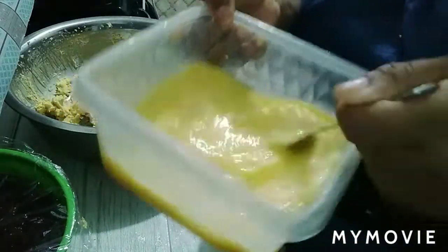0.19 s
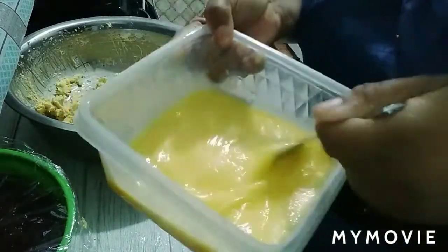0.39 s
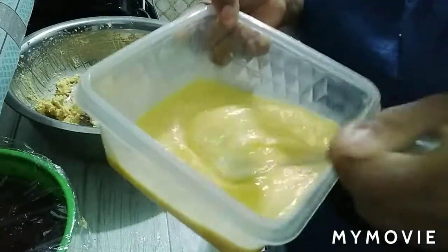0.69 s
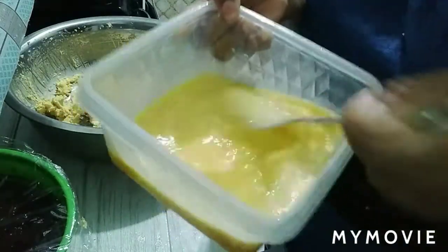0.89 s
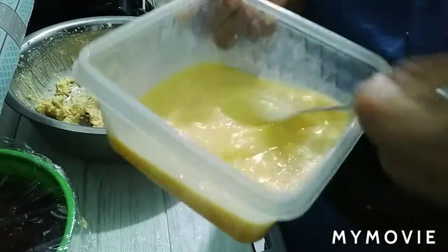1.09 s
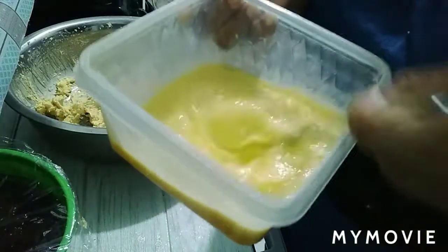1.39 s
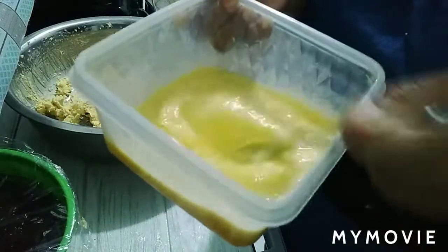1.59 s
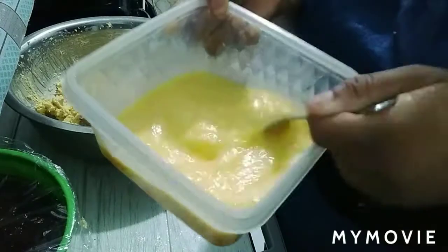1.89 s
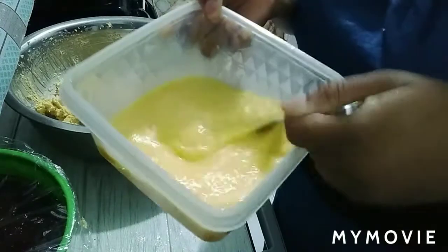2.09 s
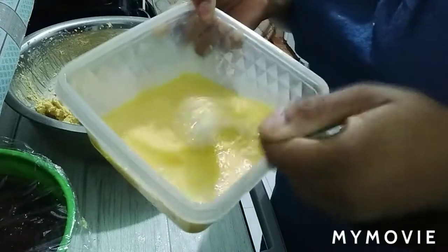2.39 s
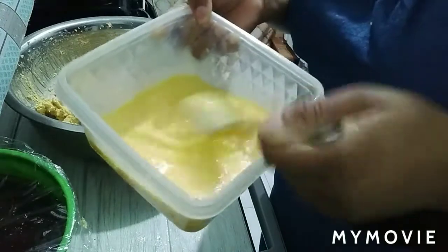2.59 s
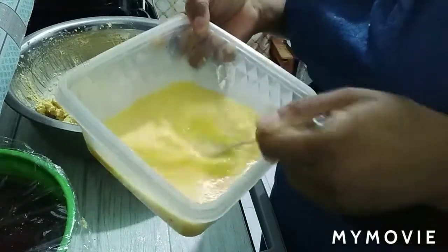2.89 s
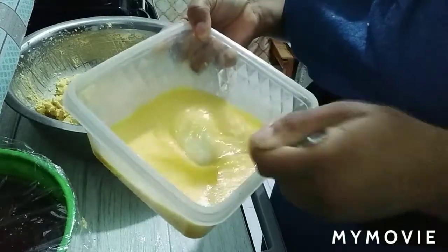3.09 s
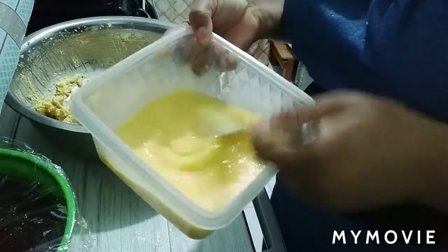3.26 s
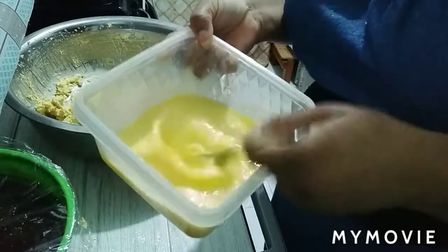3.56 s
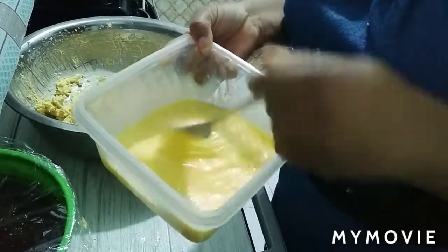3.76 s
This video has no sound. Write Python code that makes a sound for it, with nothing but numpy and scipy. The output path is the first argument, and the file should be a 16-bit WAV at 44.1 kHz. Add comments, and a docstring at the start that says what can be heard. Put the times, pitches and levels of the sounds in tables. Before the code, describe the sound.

A fork briskly beats eggs in a plastic tub, hollow knocks and wet sloshes nearly five times a second

```python
"""A fork beats eggs in a hand-held plastic tub in a small kitchen, close to five turns a second.
It starts with soft sloshes and a knock that also catches the side of the tub, which rings on.
On each later turn the wet tines spit crackling drops, plunge in with a slosh of ringing bubbles, drag
through the egg with a squelch of fine clicks and knock on the tub, whose modes give a short hollow note.
The last knock is gentle, then the background hiss, filtered noise over a low rumble, is faded down."""
import sys
import numpy as np
from scipy import signal
from scipy.fft import rfft, irfft
from scipy.io import wavfile

SR = 44100
rng = np.random.default_rng(int(sys.argv[2]) if len(sys.argv) > 2 else 0)


def unload_audio(sound):
    """Save the sound as a 16-bit wav file, at the path given as the first command line argument."""
    columns = np.transpose(np.atleast_2d(sound))
    # keep every value between -1 and 1, then stretch to whole-number steps
    steps = np.round(np.clip(columns, -1, 1) * 32767)
    wavfile.write(sys.argv[1], SR, steps.astype(np.int16))


N = 174195
AGE = np.arange(SR // 4) / SR  # time since a short sound began [s]

# In all tables, t60 is the time a sound takes to fall by 60 dB.
# the fork knocks on the tub; the levels are added to those of the modes, clack and tick:
# (time [s], hollow note [dB], wall clack [dB], tine tick [dB])
KNOCKS = [(0.2154, -19.5, -1, -1.5), (0.219, -4.5, 1, -5), (0.4438, -8.5, -4.5, -14), (0.6364, 0, 7.5, 1.5),
          (0.8483, 1, 5, 2), (1.0634, 2, 8.5, 2.5), (1.2712, 1, 7, 1), (1.4820, 1, 5.5, 4),
          (1.7017, 0.5, 4.5, 3.5), (1.9168, -1.5, 2, -11), (2.1242, -0.5, 4.5, 4), (2.3432, -3, 6.5, -7),
          (2.5657, -2.5, 2, 1.5), (2.7902, -1.5, 3, 0.5), (2.9947, -0.5, 3.5, 1), (3.2229, -2, 1.5, -22),
          (3.4419, -3.5, 2.5, 1.5), (3.6874, -11.5, -6.5, -38)]
# blend of the two wall levels, almost wholly mid-wall throughout:
# (time [s], share of mid-wall level [0 to 1])
MID_WALL_SHARE = [(1.7, 1), (1.92, 0.97)]
# modes of the loaded tub, and the low notes that linger around it:
# (frequency [Hz], level [dB], t60 [s], polarity [+1 or -1])
TUB_MODES = [(198.6, -40, 0.11, 1), (358.4, -15, 0.018, 1), (528.3, -2, 0.017, -1), (581, -5, 0.015, 1),
             (446, -47.5, 0.29, 1), (560, -56, 0.044, 1)]
# modes of the walls:
# (frequency [Hz], level struck near the corner [dB], level struck mid-wall [dB], t60 [s])
WALL_MODES = [(920, -40, -44.5, 0.03), (1157, -43, -39, 0.027), (1375, -44.5, -38.5, 0.012),
              (1510, -37, -43, 0.042), (1775, -53, -51, 0.051), (2447, -44, -55, 0.04)]
# modes of the tub's side, caught by the first knock:
# (frequency [Hz], level [dB], t60 [s], polarity [+1 or -1])
SIDE_MODES = [(205.6, -44, 0.25, 1), (332, -20, 0.035, 1), (573, -15.5, 0.036, -1), (651, -38.5, 0.16, 1),
              (830, -22, 0.027, 1), (928, -27, 0.046, -1)]
SIDE_KNOCK_S = .2156
TUB_DETUNE, WALL_DETUNE = 0.022, 0.011  # typical change of pitch from blow to blow, as a share
DAMPING_SCATTER, WALL_SCATTER_DB = 0.11, 3  # typical change of damping (log scale) and of strength

# tone colour of the tines' tick: (frequency [Hz], level [dB])
TICK_COLOUR = [(1500, -6), (2300, -5.5), (2750, 5), (3150, -15.5), (3550, 2.5), (4500, -11), (5300, -5),
               (7200, -4.5), (8500, -24), (10400, -21), (12000, -36.5), (16000, -47.5)]
# tone colour of the grit in the wall clack: (frequency [Hz], level [dB])
CLACK_COLOUR = [(300, -21.5), (900, 2.5), (1600, -3.5), (2200, -13), (3200, -22.5), (8000, -46)]
TICK_DB, TICK_FADE_S = -49.5, 0.0021
CLACK_DB, CLACK_FADE_S = -46.5, 0.0043
SPLASH_DB, SPLASH_FADE_S = -59.5, 0.038
KNOCK_CLICKS_PER_S = 12000

# egg tears off the rising tines: (time [s], level [dB])
SPITS = [(0.346, -54.5), (0.55, -59), (0.765, -47.5), (.985, -52.5), (1.187, -52.5), (1.4, -58.5),
         (1.612, -59), (1.823, -53), (2.033, -58), (2.256, -61.5), (2.472, -57.5), (2.694, -50),
         (2.91, -56), (3.137, -58), (3.353, -56)]
# tone colour of the spits: (frequency [Hz], level [dB])
SPIT_COLOUR = [(400, -23), (1000, 15.5), (2200, 9), (3500, -8.5), (5000, -10.5), (7300, 2), (8700, -12.5),
               (10500, -3.5), (13000, -21.5), (16000, -15)]
SPIT_FADE_S = 0.018

# the tines break the surface: (time [s], bubbles [dB], low plop [dB], middle bubble pitch [Hz])
SLOSHES = [(0.14, -49.5, -56.5, 1880), (0.175, -53.5, -62, 1720), (.367, -42.5, -42, 1690),
           (.405, -50.5, -61, 1850), (0.575, -39.5, -42, 1230), (.789, -43, -40, 1037),
           (1.014, -44.5, -47, 1530), (1.213, -40, -48, 1656), (1.426, -43, -41, 1734),
           (1.639, -42.5, -52.5, 1550), (1.663, -45, -48, 1500), (1.856, -45, -53, 1450),
           (2.069, -43, -50.5, 1475), (2.286, -41.5, -45.5, 1540), (2.508, -45, -51, 1570),
           (2.527, -49.5, -59.5, 1630), (2.696, -51, -75, 1580), (2.731, -47.5, -50, 1690),
           (2.946, -49, -63, 1680), (3.166, -44, -49, 1570), (3.384, -44, -50, 1586),
           (3.413, -55, -55, 1780), (3.603, -45, -50.5, 1600)]
# tone colour of the slosh's dull body: (frequency [Hz], level [dB])
BODY_COLOUR = [(150, -17.5), (300, 1), (520, 6.5), (680, -4), (1000, -13), (2000, -50.5)]
# tone colour of fine wet fizz, used for sloshes and splashes: (frequency [Hz], level [dB])
FIZZ_COLOUR = [(1000, -22.5), (2400, 5), (3400, -5.5), (4500, -6), (7400, 1), (8600, -22), (10500, -7.5),
               (15000, -35)]
PLOP_MIDDLE_HZ, PLOP_T60_S, PLOP_RISE_S = 174.4, 0.063, 0.015
SLOSH_FADE_S, FIZZ_FADE_S = 0.006, 0.022
SLOSH_BODY_DB, SLOSH_FIZZ_DB = -1, -22  # beside the bubbles
BUBBLE_CYCLES = 39  # a bubble falls by 60 dB in this many cycles
BUBBLE_SPREAD_OCT, BUBBLE_SIZE_DB = 0.331, 1.5  # typical spread of pitch and strength
BUBBLE_RISE_PER_S = 5.9  # rise of pitch, as a share of the starting pitch

# the fork traps a large pocket of air, a hollow gulp: (time [s], level [dB], middle pitch [Hz])
GULPS = [(0.767, -36, 984), (1.399, -45.5, 877), (1.612, -42, 850), (2.912, -49, 924)]
GULP_SPREAD_OCT, GULP_FROTH_DB, FROTH_HZ = 0.197, -8, 1533  # froth level is beside the gulp

# tone colour of the drag through the egg: (frequency [Hz], level [dB])
DRAG_COLOUR = [(200, -22), (500, 7), (900, 4), (1700, 7.5), (2500, 2.5), (3200, -14), (7300, -15.5),
               (15000, -40)]
DRAG_DB, DRAG_LEAD_S, DRAG_FADE_S = -51, .05, 0.038  # lead: how long before the knock it starts
POPS_DB, POPS_FADE_S = -49.5, 0.052
CRACKLES_PER_S, CRACKLE_SIZE_DB, CRACKLE_RISE_S = 2200, 4, 0.00061

# echoes from nearby surfaces: (delay [s], level [dB])
ECHOES = [(.0092, -13.5), (.0204, -18)]
# the kitchen's tail: (frequency [Hz], level [dB], t60 [s])
TAIL = [(120, -6, 0.28), (242, -8, 0.37), (484, -13, 0.27), (870, -6, .32), (2040, -10.5, 0.28),
        (3980, -6.5, 0.21), (6900, -7, 0.14), (14000, -10.5, 0.19)]
ECHO_CUT_HZ = 1200
TAIL_BUILD_S, TAIL_BUILD_CYCLES = 0.0068, 2.43  # build-up time: a fixed part plus some cycles
TAIL_CHANGE = 0.78  # share of the tail's energy that changes from turn to turn as the tub moves

# tone colour of the background hiss: (frequency [Hz], level [dB])
HISS_COLOUR = [(20, 0), (250, -7), (480, -5), (750, -14), (1800, -15.5), (2700, -29), (3300, -41.5),
               (16000, -49.5)]
# fade of the background hiss near the end: (time [s], added level [dB])
HISS_FADE = [(3.7, 1), (3.851, -9.5)]
HISS_DB, RUMBLE_DB, RUMBLE_HZ = -60, -61, 74
TOP_STOP_HZ = 15900  # from here up, the sound is at least 60 dB weaker


def knocks():
    """The fork hits the tub: hollow note, clack of the walls, gritty tick of the tines, fine wet splash."""
    out = np.zeros(N)
    for time, note_db, clack_db, tick_db in KNOCKS:
        note = ring(TUB_MODES, detune=TUB_DETUNE)
        share = np.interp(time, *np.transpose(MID_WALL_SHARE))
        walls = [(hz, corner_db + share * (middle_db - corner_db), t60, -1)
                 for hz, corner_db, middle_db, t60 in WALL_MODES]
        clack = ring(walls, WALL_SCATTER_DB, WALL_DETUNE)
        clack += crackle(CLACK_COLOUR, CLACK_FADE_S, CLACK_DB, KNOCK_CLICKS_PER_S)
        tick = crackle(TICK_COLOUR, TICK_FADE_S, TICK_DB + tick_db, KNOCK_CLICKS_PER_S)
        # the splash follows the tick's level only in part
        splash_db = SPLASH_DB + 0.32 * tick_db
        splash = crackle(FIZZ_COLOUR, SPLASH_FADE_S, splash_db, KNOCK_CLICKS_PER_S)
        add(out, time, from_db(note_db) * note + from_db(clack_db) * clack + tick + splash)
    add(out, SIDE_KNOCK_S, ring(SIDE_MODES))
    return out


def ring(modes, scatter_db=0, detune=0):
    """One blow makes each mode sound as a fading sine."""
    # all modes share one random change of damping and one of pitch
    fall = np.log(1000) * AGE * np.exp(DAMPING_SCATTER * rng.standard_normal())
    turn = 2 * np.pi * (1 + detune * rng.standard_normal()) * AGE
    out = np.zeros(len(AGE))
    for hz, db, t60, polarity in modes:
        # with scatter, as for the walls, each mode also varies in strength
        strength = np.sign(polarity) * from_db(db + scatter_db * rng.standard_normal())
        out += strength * np.exp(-fall / t60) * np.sin(hz * turn)
    return out


def egg():
    """The wet sounds of the egg: spits, sloshes, gulps and drags together."""
    return spits() + sloshes() + gulps() + drags()


def spits():
    """Egg tears off the tines in short sprays of clicks."""
    out = np.zeros(N)
    for time, db in SPITS:
        add(out, time, crackle(SPIT_COLOUR, SPIT_FADE_S, db))
    return out


def sloshes():
    """The tines plunge in: ringing bubbles, a low plop, a dull body and a little fizz."""
    out = np.zeros(N)
    for time, db, plop_db, hz in SLOSHES:
        slosh = burst(bubbles(hz), db) + burst(plop(), plop_db)
        slosh += crackle(BODY_COLOUR, SLOSH_FADE_S, db + SLOSH_BODY_DB)
        slosh += crackle(FIZZ_COLOUR, FIZZ_FADE_S, db + SLOSH_FIZZ_DB)
        add(out, time - .001, slosh)
    return out


def plop():
    """A low sine that swells softly and fades, at a slightly different pitch each time."""
    hz = PLOP_MIDDLE_HZ * rng.uniform(0.85, 1.084)
    envelope = (1 - np.exp(-AGE / PLOP_RISE_S)) * np.exp(-np.log(1000) * AGE / PLOP_T60_S)
    return envelope * np.sin(2 * np.pi * hz * AGE)


def gulps():
    """A trapped pocket of air sounds as a group of lower bubbles, with softer froth on top."""
    out = np.zeros(N)
    for time, db, hz in GULPS:
        hollow = burst(bubbles(hz, GULP_SPREAD_OCT), db)
        froth = burst(bubbles(FROTH_HZ), db + GULP_FROTH_DB)
        add(out, time, hollow + froth)
    return out


def drags():
    """Before each knock the tines drag through the egg: a squelch of clicks and some wet pops."""
    out = np.zeros(N)
    for time, note_db, _, _ in KNOCKS:
        squelch = crackle(DRAG_COLOUR, DRAG_FADE_S, DRAG_DB)
        pops = burst(bubbles(FROTH_HZ, fade_s=POPS_FADE_S, count=7), POPS_DB)
        # louder notes have stronger drags, by half as many decibels
        add(out, time - DRAG_LEAD_S, from_db(.5 * note_db) * (squelch + pops))
    return out


def bubbles(pitch_hz, spread_oct=BUBBLE_SPREAD_OCT, fade_s=SLOSH_FADE_S, count=14):
    """Trapped bubbles, densest as the tines enter, each ringing briefly and rising in pitch."""
    out, t = np.zeros(len(AGE)), AGE[:1500]
    for k in range(count):
        born = 2 * fade_s * ((k + rng.random()) / count) ** 2
        hz = pitch_hz * 2 ** (spread_oct * rng.standard_normal())
        hz = min(hz, rng.uniform(2070, 2540))  # no very high bubbles
        size = from_db(BUBBLE_SIZE_DB * rng.standard_normal()) * np.exp(-.5 * born / fade_s)
        envelope = np.exp(-np.log(1000) * t * hz / BUBBLE_CYCLES) * (1 - np.exp(-4 * t * hz))
        phase = 2 * np.pi * hz * t * (1 + BUBBLE_RISE_PER_S * t / 2)
        add(out, born, size * envelope * np.sin(phase))
    return out


def crackle(spectrum, fade_s, db, per_s=CRACKLES_PER_S):
    """A fading spray of tiny clicks at random moments, filtered to a tone colour."""
    n = len(AGE)
    size_db = CRACKLE_SIZE_DB * np.minimum(rng.exponential(1, n), 3)
    sizes = from_db(size_db) * rng.choice([-1, 1], n)
    happens = rng.random(n) < per_s / SR
    envelope = np.exp(-AGE / fade_s) * (1 - np.exp(-AGE / CRACKLE_RISE_S))
    return burst(colour(sizes * happens * envelope, spectrum), db)


def kitchen(x):
    """Dull, close echoes and a diffuse tail that differs on each turn because the tub is held in the hand."""
    out = np.zeros(N)
    steady = np.sqrt(1 - TAIL_CHANGE) * diffuse_tail()
    dull = np.exp(-2 * np.pi * ECHO_CUT_HZ * AGE)  # smooths away the treble
    for delay, db in ECHOES:
        add(steady, delay, from_db(db) * dull / dull.sum())
    # the first two knocks share one tail
    turns = [0] + [int(knock[0] * SR) for knock in KNOCKS[2:]] + [N]
    for start, end in zip(turns, turns[1:]):
        response = steady + np.sqrt(TAIL_CHANGE) * diffuse_tail()
        add(out, start / SR, signal.fftconvolve(x[start:end], response))
    return out


def diffuse_tail():
    """Many blended reflections, made of noise bands that build later in the bass and die at their own rates."""
    t = np.arange(SR // 2) / SR
    response = np.zeros(len(t))
    edges = np.geomspace(90, 16000, 14)
    for low, high in zip(edges, edges[1:]):
        hz = np.sqrt(low * high)
        band = signal.butter(2, [low, high], "band", fs=SR, output="sos")
        noise = signal.sosfilt(band, rng.standard_normal(len(t)))
        even = noise / np.sqrt(np.abs(signal.hilbert(noise)) + 1e-12)  # softens the ups and downs
        build = 1 - np.exp(-(t / (TAIL_BUILD_S + TAIL_BUILD_CYCLES / hz)) ** 2)
        tail = even * build * np.exp(-np.log(1000) * t / at_hz(TAIL, hz, axis=2))
        # wider bands get more energy
        scale = np.sqrt(2 * (high - low) / SR / np.sum(tail ** 2))
        response += tail * from_db(at_hz(TAIL, hz)) * scale
    return response


def ambience():
    """Faint background hiss, made of coloured noise, over a steady low rumble of low-passed noise."""
    hiss = colour(rng.standard_normal(N), HISS_COLOUR)
    hiss_db = HISS_DB + np.interp(np.arange(N) / SR, *np.transpose(HISS_FADE))
    lowpass = signal.butter(2, RUMBLE_HZ, fs=SR, output="sos")
    rumble = signal.sosfilt(lowpass, rng.standard_normal(N))
    return from_db(hiss_db) * hiss / np.std(hiss) + from_db(RUMBLE_DB) * rumble / np.std(rumble)


def from_db(db):
    """Turn decibels into a gain."""
    return 10 ** (np.asarray(db) / 20)


def at_hz(points, hz, axis=1):
    """Read a table column at a frequency, between rows on a log-frequency scale."""
    table = np.array(points)
    return np.interp(np.log(hz), np.log(table[:, 0]), table[:, axis])


def add(out, time, sound):
    """Mix a sound in at a time in seconds."""
    i = max(int(round(time * SR)), 0)
    out[i:i + len(sound)] += sound[:N - i]


def burst(x, db):
    """Scale a short sound to the energy of 20 ms at the given level."""
    return x * from_db(db) * np.sqrt(SR / 50 / (np.sum(x ** 2) + 1e-20))


def colour(x, spectrum):
    """Filter to a spectrum with minimum phase, so that the sound never starts early."""
    n = len(x)
    hz = np.maximum(np.arange(n // 2 + 1) * SR / n, 1)
    cepstrum = irfft(np.log(from_db(at_hz(spectrum, hz))), n)
    # folding the cepstrum into its first half gives the minimum phase
    cepstrum[1:n // 2] *= 2
    cepstrum[n // 2:] = 0
    return irfft(rfft(x) * np.exp(rfft(cepstrum)), n)


def scene():
    """The tub close by, the kitchen around it."""
    tub = knocks() + egg()
    return (tub + kitchen(tub) + ambience())[None]


def record(dry):
    """A steep low-pass filter cuts off the top of the treble."""
    return signal.sosfilt(signal.cheby2(14, 60, TOP_STOP_HZ, fs=SR, output="sos"), dry)


dry = scene()
out = record(dry)
unload_audio(out)
```